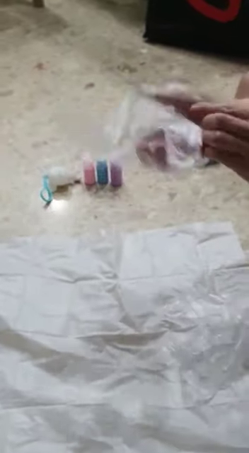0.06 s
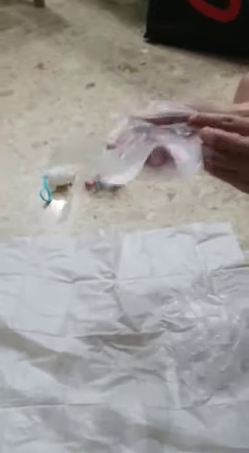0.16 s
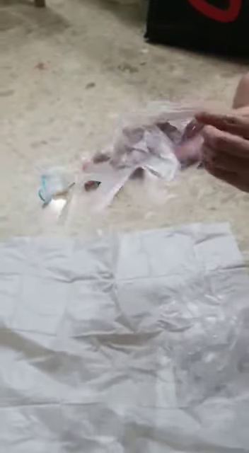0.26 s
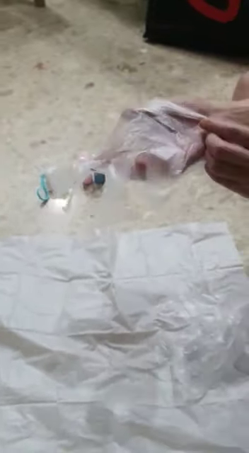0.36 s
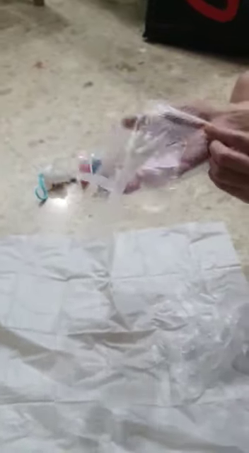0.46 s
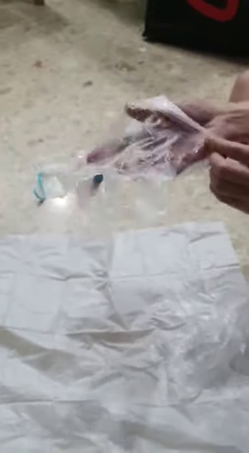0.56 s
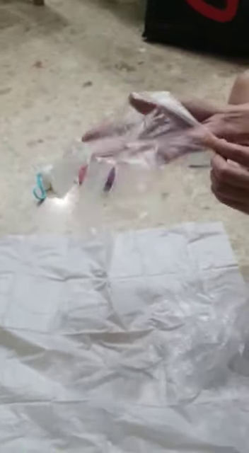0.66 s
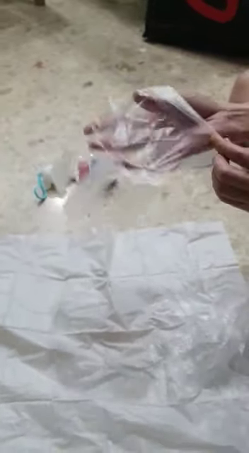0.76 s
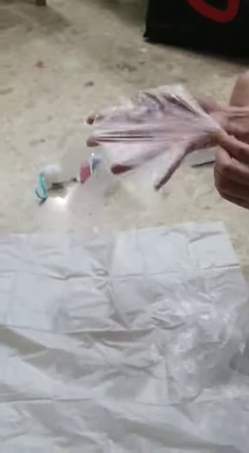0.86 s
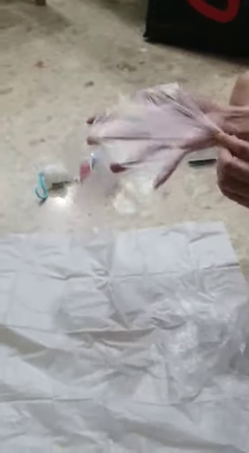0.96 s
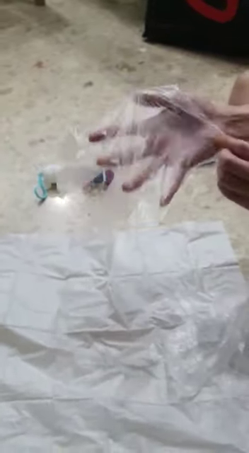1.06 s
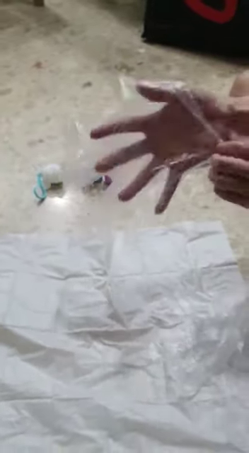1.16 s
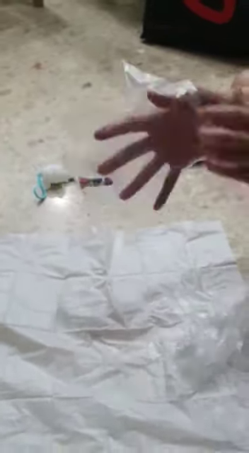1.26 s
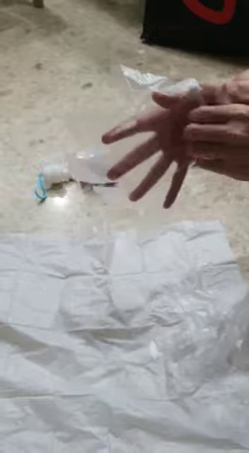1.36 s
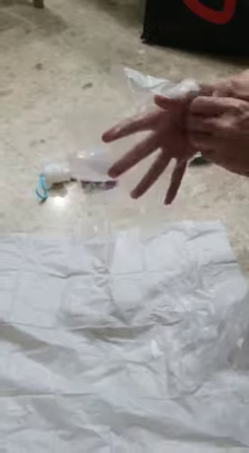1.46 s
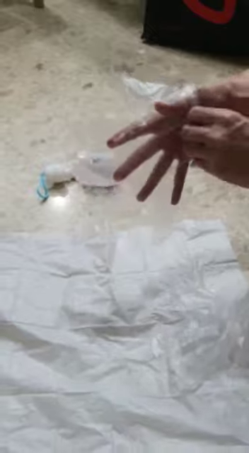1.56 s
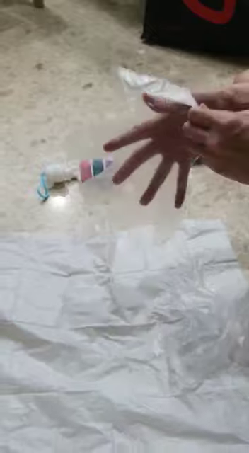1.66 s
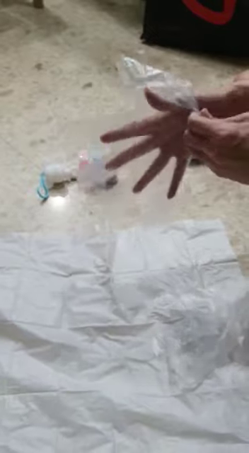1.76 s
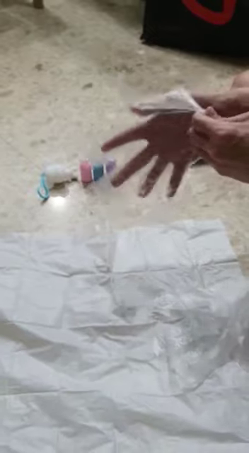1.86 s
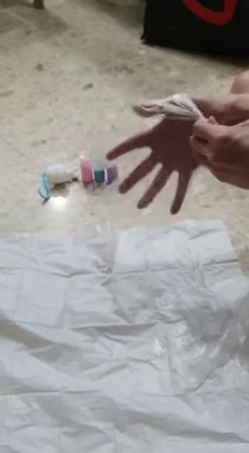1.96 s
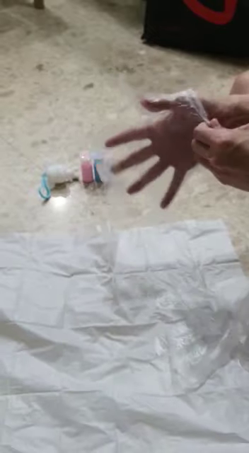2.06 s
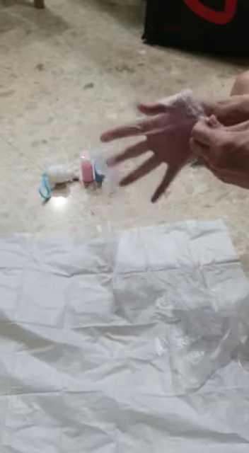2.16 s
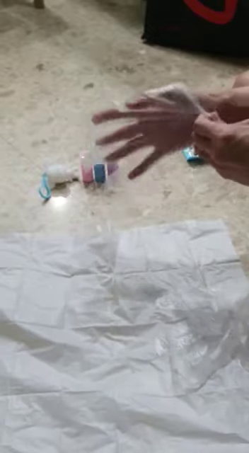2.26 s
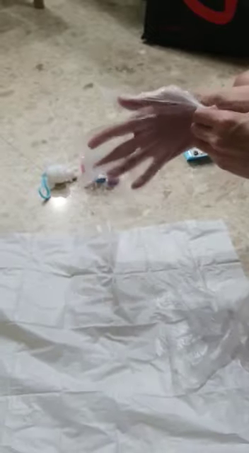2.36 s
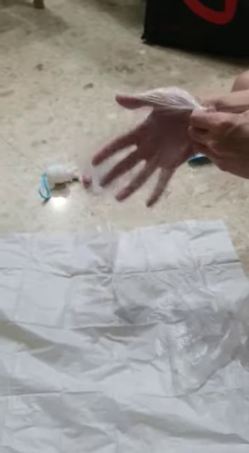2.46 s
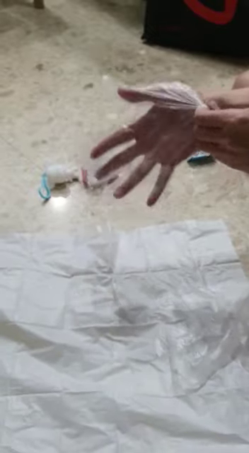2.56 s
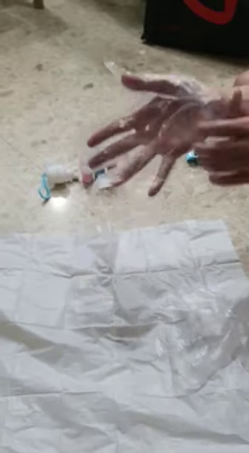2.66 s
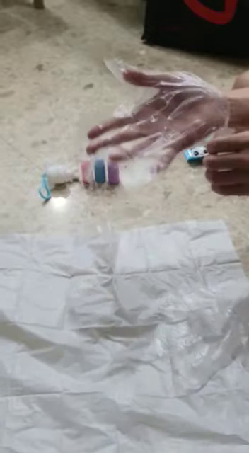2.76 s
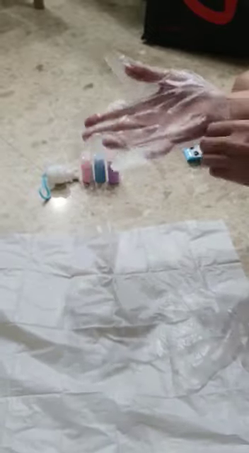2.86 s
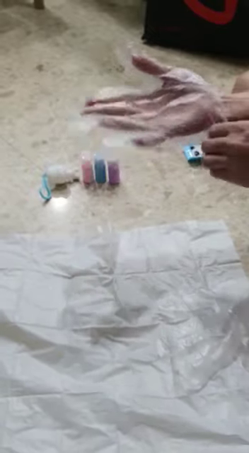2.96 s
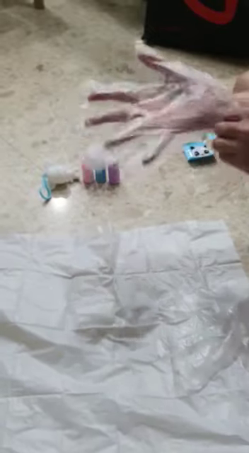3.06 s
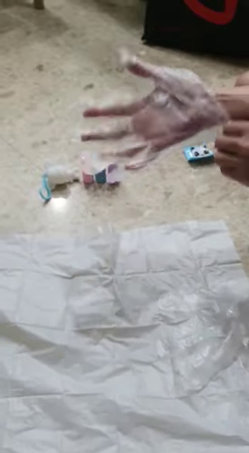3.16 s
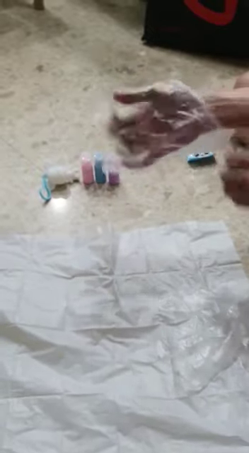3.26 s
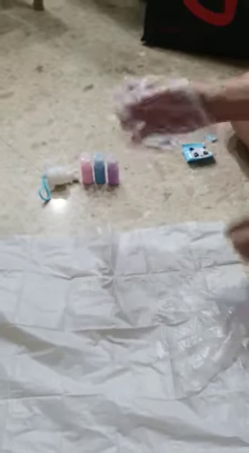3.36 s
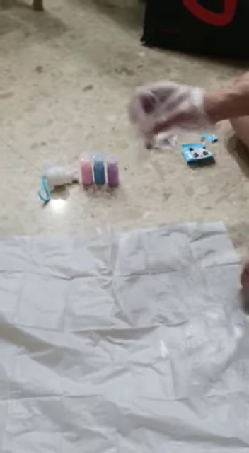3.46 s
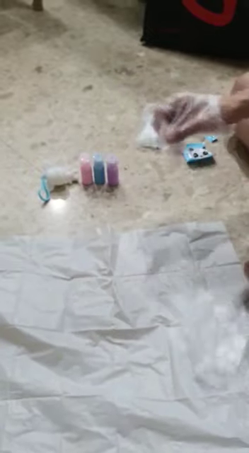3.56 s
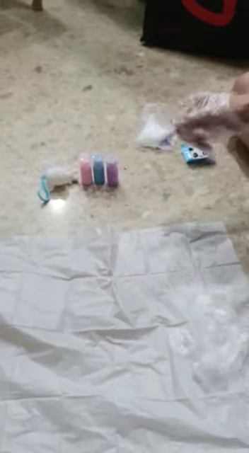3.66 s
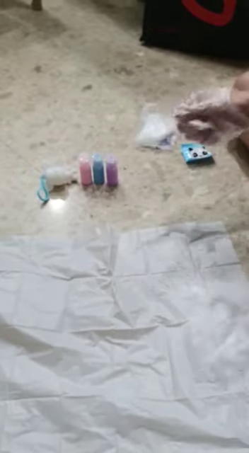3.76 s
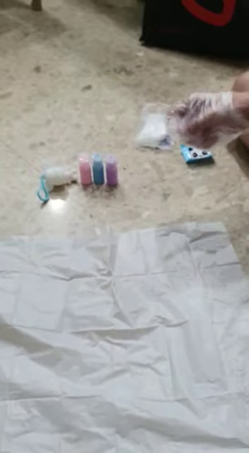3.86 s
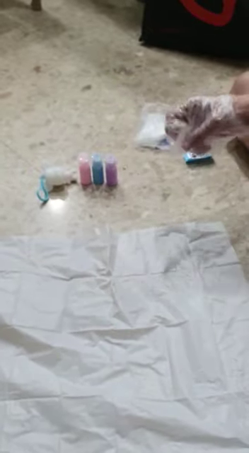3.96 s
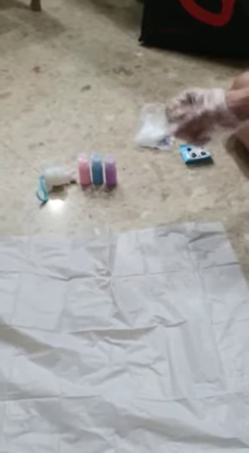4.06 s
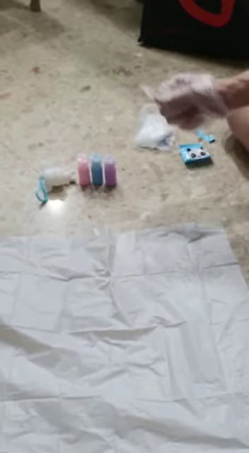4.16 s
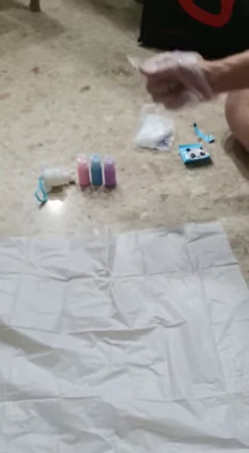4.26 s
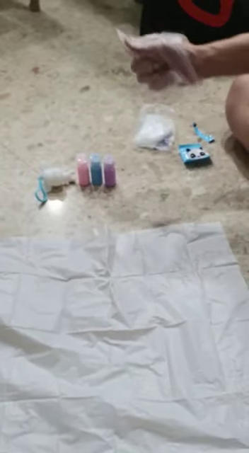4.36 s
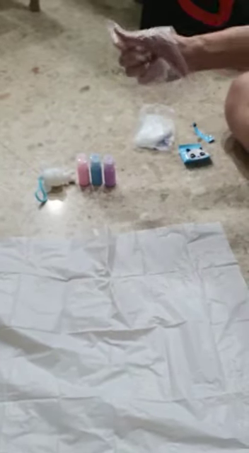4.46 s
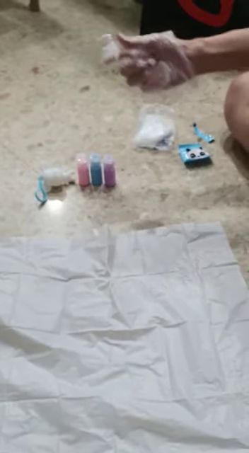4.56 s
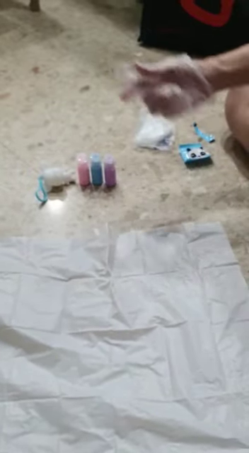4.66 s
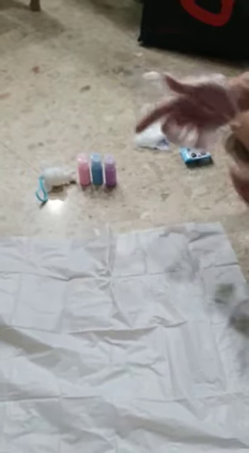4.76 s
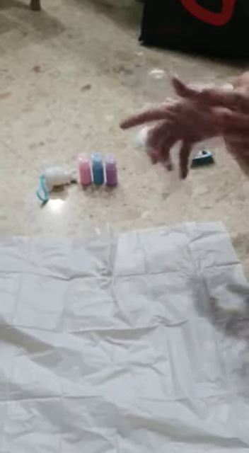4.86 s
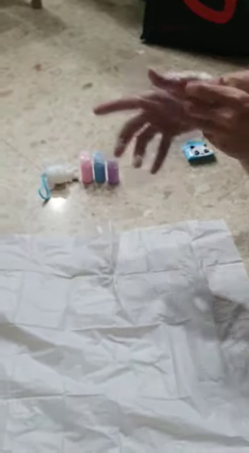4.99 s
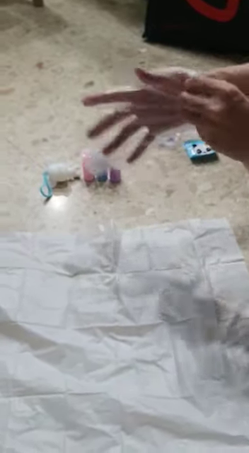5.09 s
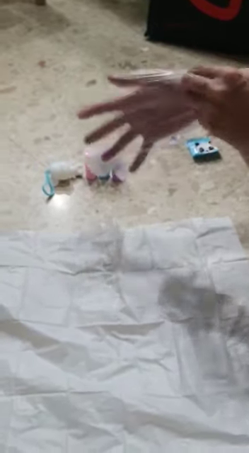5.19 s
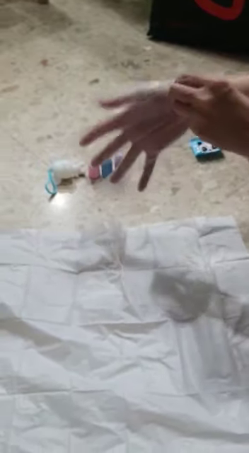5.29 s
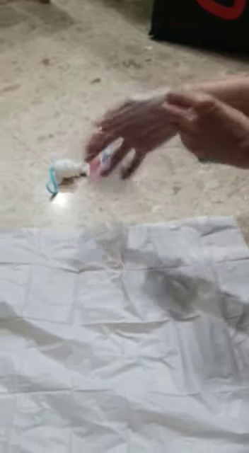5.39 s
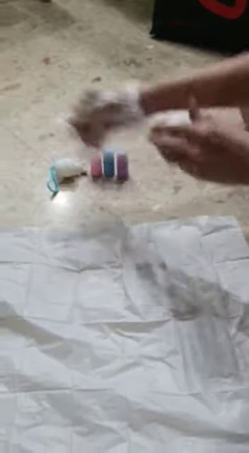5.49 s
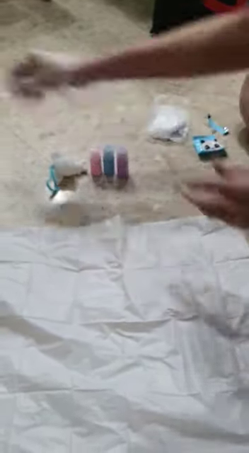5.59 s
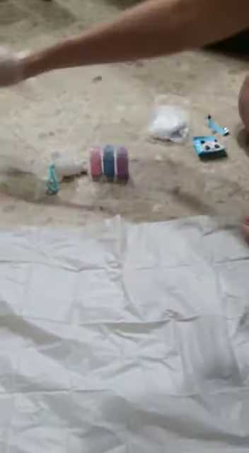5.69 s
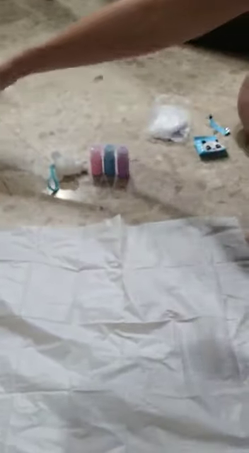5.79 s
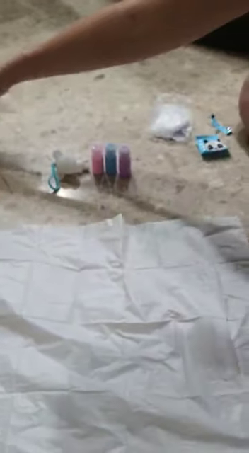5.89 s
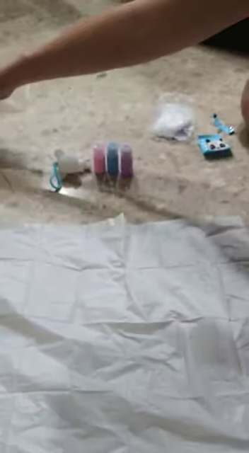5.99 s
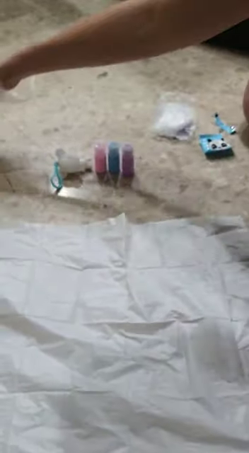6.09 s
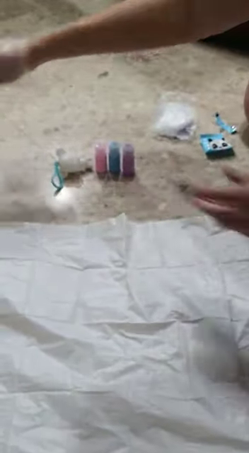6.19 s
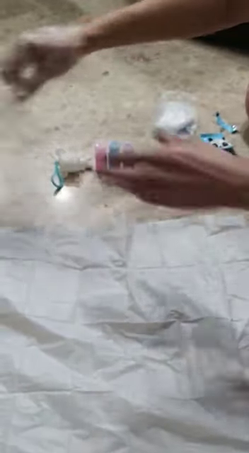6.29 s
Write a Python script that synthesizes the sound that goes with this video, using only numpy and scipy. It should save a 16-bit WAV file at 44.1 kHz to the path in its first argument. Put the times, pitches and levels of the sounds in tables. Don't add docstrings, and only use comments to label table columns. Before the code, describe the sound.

Thin plastic glove handled very close to a stereo handheld microphone in a small, hard, stone-floored room with a short bright tail. From 0 s crisp crackling comes in uneven tugs, with strong clumps around 0-0.2 s and a louder flurry at 0.7-0.85 s, mixing fine ticks, papery wrinkles, duller fold pops and little puffs of air. Light rustling continues at 1-1.2 s and thins around 1.4 s; sharp bursts return at 1.6-2.0 s, with a hard snap near 1.8 s. The loudest single crack hits at 2.15 s, followed by smaller crinkles, a lull near 2.7 s, and busy crackling at 2.85-3.15 s. From 3.25 to 5 s only soft, sparse flexing crinkles remain. A bright strong burst comes at 5.1-5.2 s, with smaller crackles at 5.3 s. A tiny dry finger tap sounds at 5.7 s, then faint rustling to 6.3 s. A weak low motor hum, soft rumble and slight hiss persist underneath.

```python
import sys
import numpy as np
from scipy import signal
from scipy.fft import rfft, irfft, next_fast_len
from scipy.io import wavfile
from scipy.ndimage import map_coordinates

SR = 44100
rng = np.random.default_rng(int(sys.argv[2]) if len(sys.argv) > 2 else 0)


def how_loud(loudness_db):
    steps = np.asarray(loudness_db, float) / 20
    return 10 ** steps


def store_pcm(level_fs):
    pcm = np.round(np.clip(level_fs, -1, 1) * 32767).astype(np.int16)
    wavfile.write(sys.argv[1], SR, np.atleast_2d(pcm).T)


N = 279153


def unit(x):
    return x / np.sqrt(np.mean(x ** 2) + 1e-20)


def along(points, hz):
    f, v = np.transpose(points)
    return np.interp(np.log(hz + 1), np.log(f + 1), v)


def wobble(rate):
    knots = rng.standard_normal(int(N * rate / SR) + 4)
    return map_coordinates(knots, [np.arange(N) * rate / SR])


def filtered(x, response):
    m = next_fast_len(N + 8192)
    return irfft(rfft(x, m) * response(np.fft.rfftfreq(m, 1 / SR)), m)[..., :N]


def causal(points, size=2048):
    cepstrum = irfft(np.log(how_loud(along(points, np.fft.rfftfreq(size, 1 / SR)))))
    cepstrum[1:size // 2] *= 2
    cepstrum[size // 2 + 1:] = 0
    return irfft(np.exp(rfft(cepstrum)))


# frequency in Hz, left-right likeness from 0 to 1.
LIKENESS = [(60, .97), (300, .88), (650, .6), (1400, 0), (15000, 0)]


def diffuse(pair):
    def turn(hz):
        return np.arccos(np.clip(along(LIKENESS, hz), -1, 1)) / 2
    mid, side = filtered(pair, lambda hz: np.array([np.cos(turn(hz)), np.sin(turn(hz))]))
    return np.array([mid + side, mid - side])


# frequency in Hz, level in dB rms.
MOTOR_LINES = [(32.3, -62.5), (91.5, -68.5), (183.0, -62.5)]
# frequency in Hz, level in dB per Hz.
RUMBLE_COLOUR = [(12, -28), (20, 3), (43, -0.5), (128, -2.5), (177, -1), (230, -8.5), (300, -4.5),
                 (584, -14.5), (1140, -11), (2500, -25), (3250, -19), (5500, -120)]


def background():
    t = np.arange(N) / SR
    lines = np.zeros(N)
    for hz, db in MOTOR_LINES:
        level = np.sqrt(2) * how_loud(db + 2.7 * wobble(6))
        lines += level * np.sin(2 * np.pi * hz * t + 0.38 * wobble(3.33))
    rumble = filtered(rng.standard_normal((2, N)), lambda hz: how_loud(along(RUMBLE_COLOUR, hz)))
    return (lines + how_loud(-58.5) * unit(diffuse(rumble))) * how_loud([[-.6], [.6]])


# time in seconds, fine crackle in dB, how deep the film folds in dB.
RESTLESS_HAND = [(0, -44, 2), (.28, -48.5, -10), (.45, -40.5, -1.5), (.8, -41.5, 0), (1.1, -51, 2),
                 (1.28, -51.5, -4), (1.36, -46.5, -12), (1.46, -50, 0), (2.1, -43.5, 1), (2.4, -49, 6),
                 (2.7, -69, -10), (3.2, -46, 2), (3.7, -55, -3), (4.27, -51.5, 0), (4.95, -46, -5.5),
                 (5.3, -48.5, 14), (5.82, -59, -12), (6.33, -59, 1.5)]
# peak time in seconds, peak in
# dB, rise in seconds, fall in seconds, fold depth in dB.
GLOVE_TUGS = [(0.017, -29, 0.058, 0.028, 6), (0.164, -31.5, 0.045, 0.051, 6.5),
              (.35, -35, 0.068, 0.11, 3), (.635, -31.5, 0.017, 0.036, 8), (.703, -24.5, 0.029, 0.041, 8),
              (.85, -23.5, .03, 0.015, 2), (.97, -35, 0.1, 0.16, 4), (1.04, -37.5, 0.22, 0.056, 1),
              (1.125, -35, 0.023, .012, 1), (1.18, -31, 0.029, 0.012, -10), (1.6, -35.5, 0.052, .2, -9),
              (1.67, -31.5, 0.023, 0.028, 0.5), (1.83, -25, 0.086, 0.081, 6),
              (1.965, -30.5, 0.11, 0.081, 6.5), (2.15, -25.5, 0.0083, 0.039, -10),
              (2.275, -30.5, 0.12, 0.056, 4.5), (2.469, -32.5, 0.054, 0.021, -4),
              (2.52, -39, .06, 0.093, 0.5), (2.6, -37, 0.041, 0.027, -4), (2.78, -56, 0.064, 0.092, -10),
              (2.875, -37.5, 0.035, 0.27, 5.5), (2.96, -35, 0.33, 0.039, -6.5),
              (3.03, -34.5, 0.012, .05, 8), (3.07, -26.5, 0.032, 0.027, -1),
              (3.105, -34.5, 0.038, 0.066, 8), (3.27, -35.5, 0.18, .12, -18),
               (3.35, -42.5, .04, 0.045, -6), (3.47, -41.5, 0.033, .07, -5), (3.545, -36, 0.028, 0.19, -3),
               (3.785, -38.5, 0.066, 0.6, -1.5), (4.12, -42, 0.38, 0.097, -3),
               (4.335, -44, 0.025, 0.033, 6.5), (4.44, -51, .1, .15, -1), (4.536, -38.5, .025, 0.048, -1),
               (4.8, -44.5, .2, 0.18, -7), (5.06, -37, 0.14, .1, -15), (5.134, -23.5, 0.019, .06, 7),
               (5.165, -24.5, 0.069, 0.015, -4), (5.26, -40.5, .05, .05, 9.5), (5.31, -36, 0.033, .055, 6),
               (5.42, -37.5, 0.093, 0.089, -14), (5.46, -37, 0.13, 0.061, -1.5),
               (5.59, -44.5, 0.051, 0.11, -7), (5.7, -48, .03, 0.095, 0), (5.94, -49, 0.064, 0.085, 2),
               (6.03, -46, 0.16, 0.2, 1)]
# start in seconds, peak in dB, fold depth
# in dB, pushed air in dB.
CREASE_AVALANCHES = [(.0014, -17, 5, -3), (.157, -18, 3.5, -16), (0.306, -26, -2, 2), (.327, -25, -5, -1),
                     (.375, -27.5, 2, 14.5), (.6274, -29, 0, 0), (0.681, -13.5, 2, -5), (0.6982, -17, 3, 10),
                     (0.7129, -14, 2, -5), (0.7855, -23, 6, 2), (.830, -9.5, 2, -7), (.848, -14, -0.5, 11),
                     (0.952, -22, 3.5, -3), (0.968, -17, 0, 2), (0.984, -18, -1, 7), (1.0392, -20, -11, 9.5),
                     (1.1138, -15.5, -2.5, 1), (1.1679, -16, -3, 6), (1.3925, -30, -10, -2),
                     (1.4905, -26, -10, -10), (1.604, -20, -10, -4), (1.67, -15, -7, 6),
                     (1.723, -19.5, -5, 9.5), (1.7731, -13, 3, 3.5), (1.789, -9, -2, -5),
                     (1.8075, -15.5, 7, -3), (1.8243, -15, 0, -10), (1.957, -15, 0.5, -1),
                     (1.989, -24.5, 6, 16),
                     (2.1372, -32, 7, 9), (2.1448, -14.5, -1, 6.5), (2.146, -6, -3.5, -7),
                   (2.1744, -23, 0, -5), (2.2084, -17.5, 4, -2), (2.2573, -12.5, 2, -9),
                   (2.2972, -16, -3, -6), (2.4252, -19, -3.5, -5), (2.4588, -16, -0.5, 2),
                   (2.8494, -23.5, -2, 7), (2.871, -17.5, 7.5, 7), (2.883, -19.5, 0, 8),
                   (2.929, -17, 6, 15), (2.9626, -13.5, 5, 14.5), (3.0274, -20, 3.5, 7),
                   (3.046, -13, -4, -1), (3.0625, -14, -5, 8), (3.091, -12.5, -1, -1),
                   (3.1248, -23, 6.5, 11), (3.2504, -21, 3, 2), (4.3862, -28.5, -3.5, -6),
                   (4.5247, -27, -4, -7), (5.116, -15.5, 1.5, -8), (5.1249, -10, 5, -6),
                   (5.136, -13, 6, -6), (5.1595, -10, 5, -14), (5.311, -22.5, 5, -5), (5.3226, -30, 12, -1),
                   (5.3434, -28, 7.5, -5), (5.581, -36, 4.5, 17)]
SIZE_SHARE = [0, -7, -11, -22.5]
DEPTH_GAIN = [0, 0.62, 1.14, 0]


def hand():
    t = np.arange(N) / SR
    share_db, follows = np.array(SIZE_SHARE)[:, None], np.array(DEPTH_GAIN)[:, None]
    s, base_db, depth_db = np.transpose(RESTLESS_HAND)
    power = how_loud(np.interp(t, s, base_db) + follows * np.interp(t, s, depth_db)) ** 2

    slope_db = 12
    for at, db, rise, fall, depth_db in GLOVE_TUGS:
        span = slice(max(round((at - 3 * rise) * SR), 0), round((at + 3 * fall) * SR))
        away = np.maximum((at - t[span]) / rise, (t[span] - at) / fall)
        power[:, span] += how_loud(db - slope_db * away + follows * depth_db) ** 2

    own_clumps = np.array([wobble(45) for _ in SIZE_SHARE])
    clumps = 1.2 * wobble(30) + 1.18 * wobble(140) + 1.14 * own_clumps
    power *= how_loud(share_db - 1 + clumps) ** 2

    crease_db, crease_t60_s = np.array([-5, -7, -8.5, -21]), 0.023
    u = t[:SR // 8]
    avalanche = how_loud(-60 * u / crease_t60_s) * (1 - np.exp(-u / 0.001))
    for at, db, depth_db, air_db in CREASE_AVALANCHES:
        size = how_loud(db + crease_db + [0, 0.72 * depth_db, 1.3 * depth_db, air_db])
        power[:, round(at * SR):][:, :len(u)] += (size[:, None] * avalanche) ** 2
    return np.sqrt(power)


def grains(count, hz, spread, cycles, size_db, lead, size=160):
    draw, t = rng.standard_normal((count, 5)), np.arange(size) / SR
    first = rng.integers(0, N, count)[:, None]
    pitch = np.clip((hz * np.ones(N))[first] * np.exp(spread * draw[:, :1]), 150, 15000)
    strength = how_loud(size_db * draw[:, 1:2]) * np.sign(draw[:, 2:3])
    shape = strength * np.exp(-t * pitch / cycles) * np.cos(2 * np.pi * pitch * t)
    start = first + np.arange(size)
    late = np.abs(np.round(lead + 2.5 * draw[:, 3:4])).astype(int)
    pan = how_loud(3.86 * draw[:, 4:])
    left = np.bincount(start.ravel(), (shape * pan).ravel(), N)[:N]
    right = np.bincount((start + late).ravel(), (shape / pan).ravel(), N)[:N]
    return unit(np.array([left, right]))


# time in seconds, pitch in Hz.
AIR_POCKET = [(0, 1920), (.3, 1700), (.7, 1410), (1.7, 1290), (2.0, 1156), (2.5, 1210), (3.05, 1485),
              (4.9, 1340), (5.14, 1150), (5.35, 1700), (5.7, 1300), (6.0, 950), (6.33, 1200)]


def glove():
    tick_level, wrinkle_level, fold_level, puff_level = hand()
    drift = 0.076
    wrinkle_hz = 3250 * np.exp(drift * wobble(5))
    pocket_hz = np.interp(np.arange(N) / SR, *np.transpose(AIR_POCKET))
    fold_hz = pocket_hz * np.exp(drift * wobble(5))
    ticks = grains(count=45000, hz=8950, spread=0.33, cycles=0.47, size_db=2.0, lead=9, size=30)
    wrinkles = grains(count=25000, hz=wrinkle_hz, spread=0.26, cycles=1.78, size_db=3.0, lead=8.9, size=80)
    folds = grains(count=12000, hz=fold_hz, spread=0.36, cycles=2.35, size_db=3.5, lead=7.8, size=200)
    puffs = grains(count=5000, hz=406, spread=0.36, cycles=1.15, size_db=1.7, lead=5.1, size=420)
    fine = how_loud(-2.0) * tick_level * ticks + how_loud(-1.5) * wrinkle_level * wrinkles
    return fine + how_loud(-3) * fold_level * folds + how_loud(4.5) * puff_level * puffs


# frequency in Hz, t60 in seconds.
WALL_DECAY = [(200, 0.23), (600, 0.21), (1500, 0.25), (6000, 0.36), (15000, 0.19)]


def room(x, count=70):
    out, step = np.zeros((2, N + SR)), N // count + 1
    for k in range(count):
        hz, t, z = signal.stft(rng.standard_normal((2, SR // 3)), SR, nperseg=256)
        decay = how_loud(-60 * t / along(WALL_DECAY, hz)[:, None])
        tail = signal.istft(z * decay, SR, nperseg=256)[1]
        tail = tail / np.linalg.norm(tail[0])
        answer = signal.fftconvolve(x[None, k * step:(k + 1) * step], tail, axes=1)
        out[:, k * step + 130:][:, :answer.shape[1]] += answer
    return diffuse(out[:, :N])


# start in seconds, level in dB, ring in Hz.
HARD_BUCKLES = [(.703, -21, 350), (0.83, -24, 3000), (0.849, -29, 2000), (.851, -22.5, 200),
                (1.115, -24, 4100), (1.170, -25, 204), (1.7925, -8, 3500), (2.146, -27.5, 140),
                (2.1480, -1, 3800), (2.964, -15, 1530), (3.05, -16, 4000), (3.064, -24, 3500),
                (5.164, -18, 3000), (5.3113, -19.5, 5100)]


def cracks():
    out, u = np.zeros((2, N)), np.arange(900) / SR
    for at, db, hz in HARD_BUCKLES:
        onset = 1 - np.exp(-u * hz * 12)
        ring = how_loud(db) * np.exp(-u * hz / 1.46) * np.cos(2 * np.pi * hz * u) * onset
        first = round(at * SR)
        out[0, first:][:len(u)] += ring
        out[1, first + 8:][:len(u)] += ring
    return out


# start in seconds, level in dB.
FINGER_TAP = [(5.6999, -24.5)]
# frequency in Hz, level in dB, t60 in seconds.
CASE_MODES = [(366, -2, 0.013), (1480, 10.5, 0.0053), (5800, -6, .004)]


def tap():
    at, db = FINGER_TAP[0]
    u = np.clip(np.arange(N) / SR - at, 0, None)
    ring = sum(how_loud(level - 60 * u / t60) * np.sin(2 * np.pi * hz * u) for hz, level, t60 in CASE_MODES)
    thin = signal.lfilter(*signal.butter(2, 170, "high", fs=SR), ring)
    return how_loud(db) * thin * how_loud([[-22], [5]])


# frequency in Hz, level in dB.
FILM_BASS = [(60, -23), (150, -12), (250, -12.5), (340, -4), (600, -5.5)]
# frequency in Hz, level in dB.
LEFT_PORT = [(1200, -3), (1800, 3), (2300, 2.5), (3300, 0.5), (4800, 2), (6500, 0), (8300, 6.5),
             (9300, -2.5), (11000, 1.5), (12500, 4), (15500, 5.5)]
# frequency in Hz, level in dB.
RIGHT_PORT = [(1250, 2.5), (1750, 7), (2150, 4.5), (3000, 6.5), (3700, 3.5), (4800, 4.5), (5700, 12.5),
              (6500, 17), (7800, 9.5), (8800, 1), (10400, 5), (12300, -5), (14500, -2.5)]


def scene():
    film = glove() + cracks()
    hiss = how_loud(-58.5) * rng.standard_normal((2, N))
    air = film + how_loud(-1.5) * room(film.mean(axis=0)) + hiss
    ports = np.array([causal(FILM_BASS + LEFT_PORT), causal(FILM_BASS + RIGHT_PORT)])
    heard = signal.fftconvolve(air, ports, axes=1)[:, :N]
    return how_loud(-2) * heard + tap() + background()


def band_limit(x):
    return signal.sosfilt(signal.butter(12, 16830, fs=SR, output="sos"), x)


def record(dry):
    rounded = dry / (1 + np.abs(dry / 1.05) ** 6) ** (1 / 6)
    mix = filtered(rounded, lambda hz: hz < 15900)
    return band_limit(mix)


dry = scene()
out = record(dry)
store_pcm(out)
```